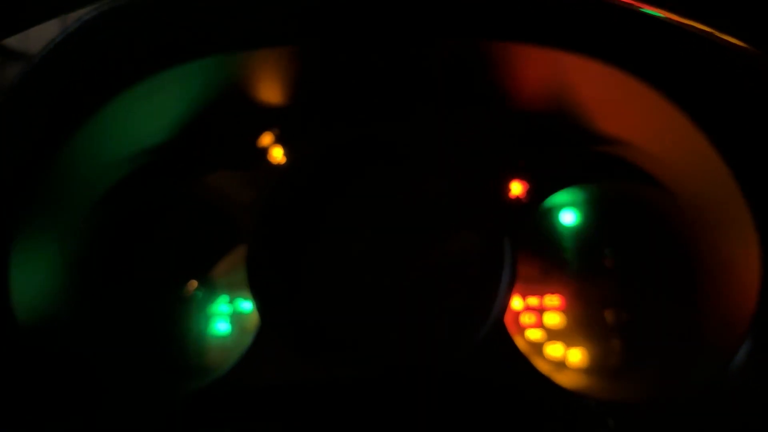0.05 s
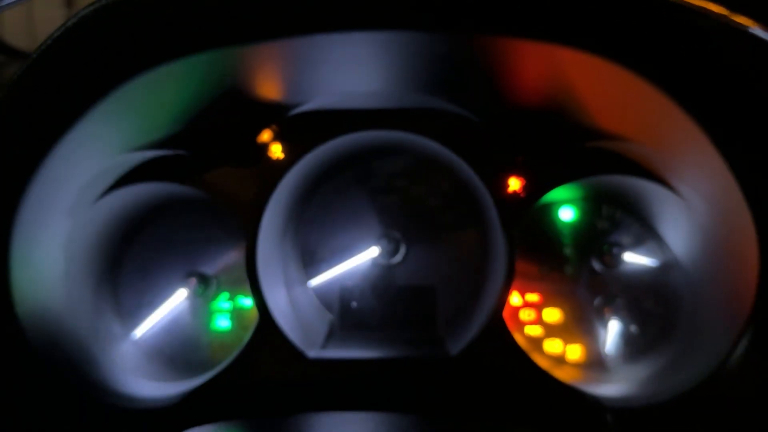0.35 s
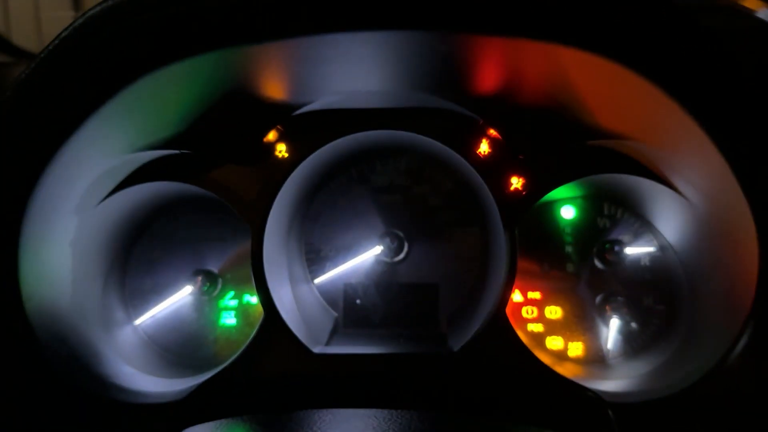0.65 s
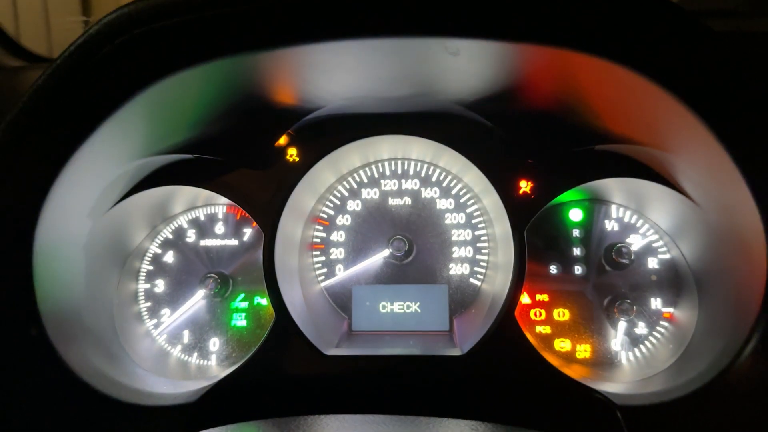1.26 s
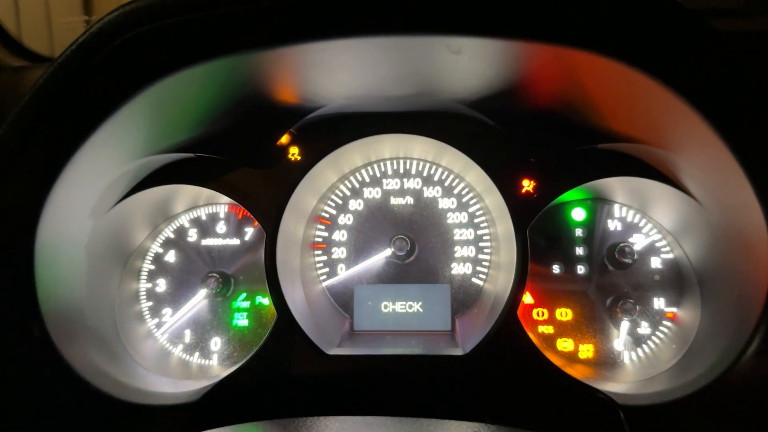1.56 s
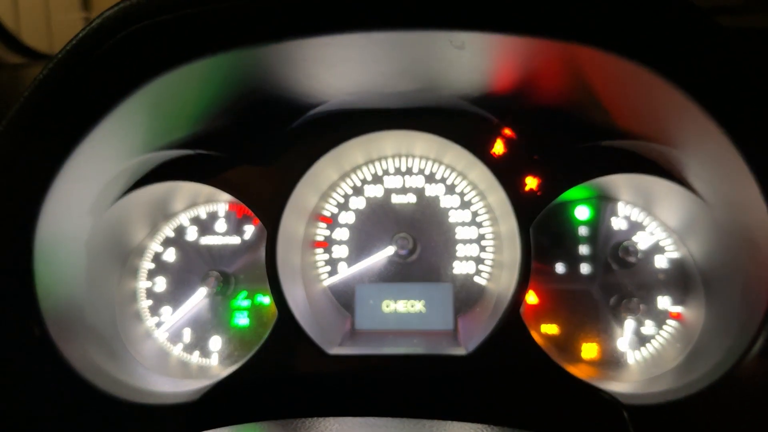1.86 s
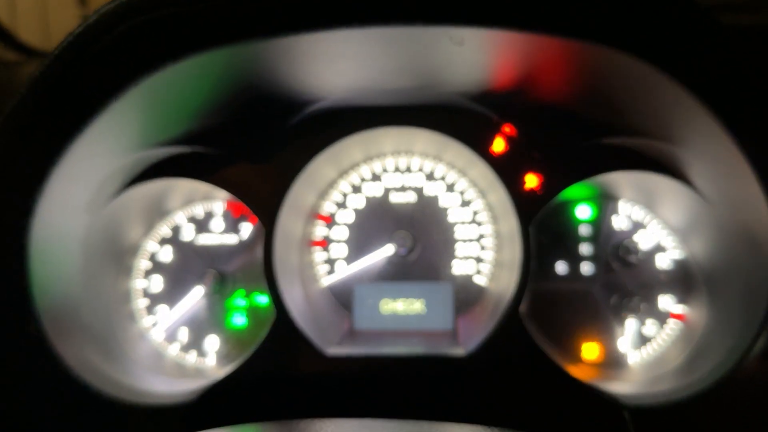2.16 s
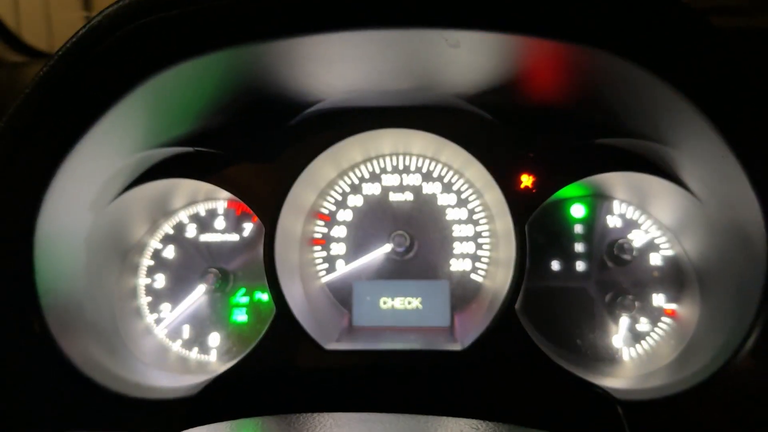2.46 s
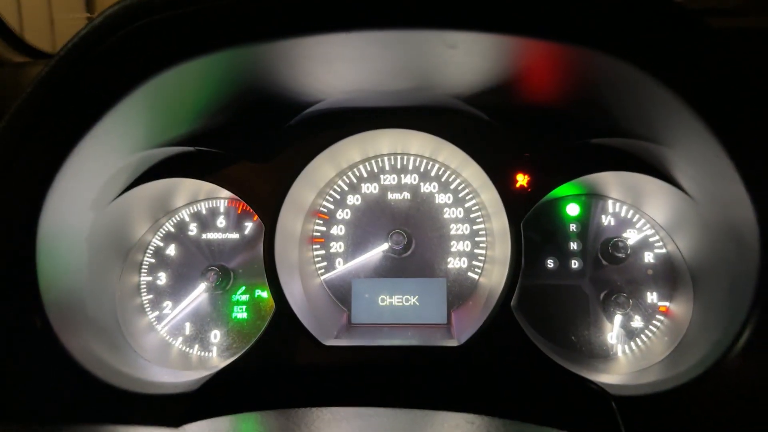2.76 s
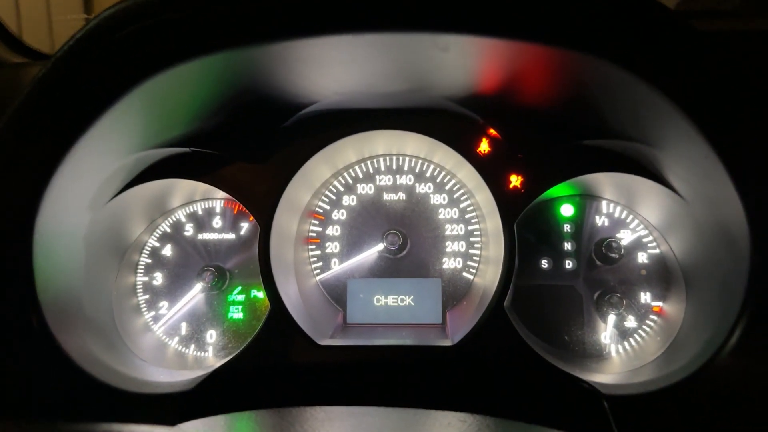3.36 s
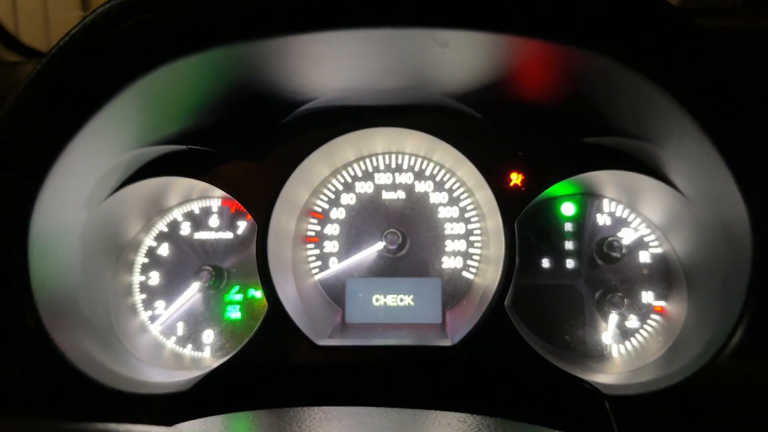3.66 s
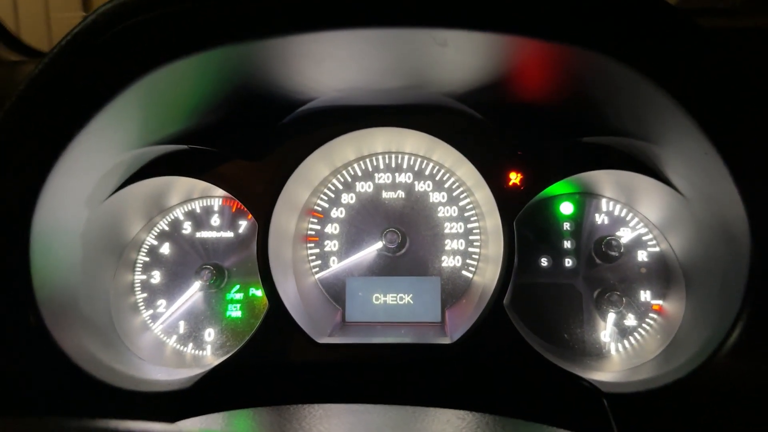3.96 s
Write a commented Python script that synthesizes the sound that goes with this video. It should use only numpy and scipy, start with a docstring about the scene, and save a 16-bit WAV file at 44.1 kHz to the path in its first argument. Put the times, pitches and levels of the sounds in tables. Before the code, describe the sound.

A car engine starts, flares briefly and settles into a low idle, heard from inside.

```python
"""A starter grinds and the first firings thump: a cold V8 catches, flares and sinks to a fast idle.
The stereo microphone is at the driver's seat, inside the cabin. Eight unequal exhaust pulses per
cycle ring the boomy modes of pipes and cabin, with a throbbing overtone and a brief intake boom.
Slack parts clank and the dry valve train clatters at first; hiss, rumble and tappet ticks carry on,
coming dully through the bulkhead."""
import sys
import numpy as np
from scipy import signal
from scipy.fft import rfft, irfft
from scipy.io import wavfile
from scipy.ndimage import uniform_filter1d, minimum_filter1d

SR = 44100
rng = np.random.default_rng(int(sys.argv[2]) if len(sys.argv) > 2 else 0)


def wrap_up_sound(samples):
    """Save the sound to the file named by the first command line argument, as 16-bit audio."""
    columns = np.atleast_2d(samples).T
    # keep every value between -1 and 1, then stretch to whole-number steps
    tamed = np.clip(columns, -1, 1)
    steps = np.round(tamed * 32767).astype(np.int16)
    wavfile.write(sys.argv[1], SR, steps)


N = 176400

# four-stroke engine speed: time_s, cycles_per_s
ENGINE_SPEED = [(0, 5.5), (.05, 7.3), (.13, 10), (.2, 13), (.28, 16.38), (.36, 16.97), (.52, 16.73),
                (.7, 15.98), (.85, 15.03), (1, 14.35), (1.25, 13.79), (1.6, 13.507), (2.1, 13.315),
                (3, 13.264), (3.5, 13.06), (4, 12.95)]
# cylinders in firing order, with their arrival down the manifold: level_db, offset_ms
CYLINDERS = [(0.5, 1.46), (4.5, 0.082), (2.5, -0.3), (1.2, 1.48), (1.03, -0.25), (3, 0.46), (1.26, 0.76),
             (0.58, -0.34)]

# hiss in the centre of the stereo image: frequency_hz, density_db
HISS_MID = [(350, -31.5), (600, -12.5), (676, -1), (741, -10), (990, -17), (1340, -28), (1510, -24),
            (2040, -36.5), (2210, -30.5), (2390, -37), (2660, -33), (3450, -37), (4400, -33.5),
            (6000, -39.5), (9550, -43), (14000, -59.5)]
# hiss at the sides: frequency_hz, density_db
HISS_SIDE = [(350, -36), (600, -8.5), (676, -5), (741, -13.5), (1190, -15.5), (1380, -16.5), (1720, -23.5),
             (2270, -35), (3600, -29), (4600, -37.5), (9550, -40), (11300, -49.5), (12300, -72),
             (14000, -45.5)]
# rumble of the running engine: frequency_hz, density_db
RUMBLE_SPECTRUM = [(25, -22), (45, -2), (90, -1.5), (200, -7.5), (330, -4.5), (600, -25.5), (900, -40.5)]
# metal striking metal: frequency_hz, density_db
CONTACT_SPECTRUM = [(620, 6), (2800, -7)]
# engine block modes: pitch_hz, width_hz, level_db, left_over_right_db, left_lead_rad, polarity
BLOCK_MODES = [(665, 39, 2, 4.5, 2.3, 1), (1004, 18, -5, 2.5, 2.4, 1), (1177, 30, -2, 3, 2.4, 1),
               (1509, 64, -0.5, 3, 2.1, 1), (1616, 100, -1.5, -1.5, 2.5, 1), (1834, 20, -8, -4.5, 0.9, 1),
               (2203, 17, -11, -4.5, 1.6, 1), (2550, 50, -10, -0.5, 1.4, 1)]

# grinding starter gear: frequency_hz, density_db
STARTER_SPECTRUM = [(1180, -29), (2000, -5), (3080, -7), (4780, -5), (5620, -12.5), (7850, -8), (8730, -12),
                    (10000, -29.5), (11600, -18.5), (14000, -23)]
# course of the grinding: time_s, level_db
STARTER_LEVEL = [(0, -49.5), (.025, -43), (.048, -44.5), (.06, -35), (.09, -36.5), (.11, -40), (.15, -34.5),
                 (.18, -45), (.28, -49.5), (.4, -61.5), (.8, -78), (1.3, -91.5)]
# ring of the freed starter: pitch_hz, width_hz, level_db, decay_db_per_s
STARTER_RINGS = [(4940, 240, -47.5, 75.5)]
# dry valve train behind the bulkhead: frequency_hz, density_db
CLATTER_SPECTRUM = [(260, -29), (450, -7.5), (553, -13.5), (674, 2), (1040, -11.5), (1200, -6.5),
                    (1290, -19), (1470, -8), (2040, -19), (2600, -25.5), (3380, -59), (5720, -120)]
# course of the clatter: time_s, level_db
CLATTER_LEVEL = [(0, -30.5), (.022, -43), (.035, -34), (.07, -22), (.14, -23), (.23, -32.5), (.3, -30),
                 (.4, -40.5), (.6, -46.5), (1, -58), (1.6, -68.5)]
# blows of slack parts on the block: start_s, level_db
CLANKS = [(.031, -26), (0.051, -20), (.08, -25.5), (.118, -18), (.138, -30), (0.186, -31.5), (0.217, -24),
          (.277, -27.5), (0.313, -35.5), (0.341, -33)]

# drive of the intake boom: time_s, gain_db
INTAKE_DRIVE = [(0, -1), (.2, 6.5), (.55, 4), (.75, -3), (1, -17), (1.4, -41)]
# how hard the firings shake the body: time_s, gain_db
THUMP_DRIVE = [(0, -7), (.022, 5.5), (.045, 14), (.1, 3), (.17, 11), (.23, 12), (.3, -16), (.5, -35.5)]
# strength of the firings in the exhaust: time_s, gain_db
EXHAUST_DRIVE = [(0, -1), (.05, 6.5), (.2, 9.5), (.32, 7), (.45, 6), (.7, 2.5), (1, 0.95), (4, 1)]
# pipe and cabin modes: pitch_hz, width_hz, level_db, left_over_right_db, left_lead_rad, polarity
EXHAUST_MODES = [(42.8, 9.1, 10, -3.2, -0.1, -1), (64.5, 8.46, 13.5, -1.8, 0.3246, 1),
                 (83.2, 19.5, 4.5, -0.8, 0.33, -1), (114.1, 28.8, -2.76, -2, 0.37, 1),
                 (171.35, 9.8, .5, -1, 0.36, -1), (195.3, 5.56, -8, -4.5, 1, 1),
                 (268.8, 52, -17, -11.5, 2.25, -1), (287.3, 30.4, -11, 12, 5, 1),
                 (320.1, 11.8, -0.5, -5.5, 1.14, 1), (349.2, 10, -8, -2.5, 3.14, -1),
                 (454.5, 18, -16.5, 6, 3, 1), (477.2, 41, -17.5, -2, 3, 1), (534, 24, -23.5, -5, 3.5, 1),
                 (618, 13, -30, -2.5, -2, 1), (664, 43, -25, 4.5, 1.83, 1), (686, 15, -32.5, 2.5, 4.5, -1)]

PULSE_GAIN_DB = 33  # added to all three drives


def amp(db):
    """Decibels to gain."""
    return 10 ** (np.asarray(db) / 20)


def curve(rows):
    """Straight lines through (time_s, value) rows."""
    return np.interp(np.arange(N) / SR, *np.array(rows).T)


def unit(x):
    """Scale to rms 1."""
    return x / np.sqrt(np.mean(x ** 2))


def stereo(mid, side):
    """Left and right from centre and sides."""
    return np.array([mid + side, mid - side])


def filtered(x, response):
    """Filter by a response given as a function of frequency."""
    hz = np.maximum(np.arange(N + 1) * SR / (2 * N), 1e-3)
    return irfft(rfft(x, 2 * N) * response(hz))[..., :N]


def resonance(f, hz, width_hz):
    """Response of one damped mode."""
    return 1 / (1 + 1j * (f * f - hz * hz) / (f * width_hz))


def resonate(x, hz, width_hz):
    """Pass twice through one damped mode."""
    return filtered(x, lambda f: resonance(f, hz, width_hz) ** 2)


def ring(x, modes):
    """Ring modes that reach the microphone's two sides with different level and phase."""
    def response(f):
        total = 0
        for hz, width_hz, db, pan_db, lead_rad, polarity in modes:
            left = amp(pan_db / 2) * np.exp(.5j * lead_rad)
            sides = np.array([[left], [1 / left]])
            total = total + polarity * amp(db) * sides * resonance(f, hz, width_hz)
        return total
    return filtered(x, response)


def noise(spectrum):
    """Noise of rms 1, shaped by a spectrum and falling steeply beyond its ends."""
    hz, db = np.array(spectrum).T
    def response(f):
        skirts = (np.minimum(f / hz[0], 1) * np.minimum(hz[-1] / f, 1)) ** 4
        return amp(np.interp(np.log(f), np.log(hz), db)) * skirts
    return unit(filtered(rng.standard_normal(N), response))


def engine_cycles(zero_s):
    """Four-stroke cycles turned, counted from zero_s."""
    cycles = np.cumsum(curve(ENGINE_SPEED)) / SR
    return cycles - np.interp(zero_s, np.arange(N) / SR, cycles)


def firings(scatter_db=0.65, jitter_ms=0.028):
    """One pulse per cylinder as the crank turns, each with its own strength and travel time."""
    slots = len(CYLINDERS) * engine_cycles(zero_s=1.9882)
    number = np.arange(np.ceil(slots[0]), slots[-1]).astype(int)
    db, offset_ms = np.array(CYLINDERS)[number % len(CYLINDERS)].T
    level_draw, time_draw = rng.standard_normal((len(number), 2)).T
    fired_s = np.interp(number, slots, np.arange(N) / SR)
    arrival_s = fired_s + (offset_ms + jitter_ms * time_draw) / 1000
    samples = np.clip(arrival_s * SR, 0, N - 1).astype(int)
    return np.bincount(samples, amp(db + scatter_db * level_draw), N)


def knocks(pulses, share, decay_s=0.022):
    """Envelope that jumps at each firing and dies quickly, over a steady part."""
    jumps = unit(signal.lfilter([1], [1, -np.exp(-1 / (decay_s * SR))], pulses))
    return unit(1 - share + share * jumps)


def engine_bay(pulses):
    """Hiss, rumble and tappets ticking on the block, beyond the bulkhead; louder at higher revs."""
    hiss = stereo(amp(-51.5) * noise(HISS_MID), amp(-55) * noise(HISS_SIDE))
    hiss *= knocks(pulses, share=0.16)
    uneven_pulses = pulses * amp(1.5 * rng.standard_normal(N))
    taps = knocks(uneven_pulses, share=0.35) * noise(CONTACT_SPECTRUM)
    ticks = amp(-53) * unit(ring(taps, BLOCK_MODES))
    rumble = amp(-38.5) * noise(RUMBLE_SPECTRUM)
    above_idle = curve(ENGINE_SPEED) - ENGINE_SPEED[-1][1]
    return (hiss + ticks + rumble) * amp(1.93 * above_idle)  # 1.93 dB for each cycle per second


def pipe_overtone(pulses):
    """A pipe overtone, pushed and pulled in turn by successive firings, swells once per cycle."""
    cycles = engine_cycles(zero_s=2.035)
    swell = np.cos(np.pi * cycles) ** 4
    push_pull = np.cos(np.pi * cycles * len(CYLINDERS))
    return amp(-41) * unit(resonate(pulses * swell * push_pull, hz=474, width_hz=50))


def starter(tooth_hz=325, release_s=0.13):
    """Gear teeth grind, then the pinion lets go and rings down."""
    t = np.arange(N) / SR
    teeth = amp(rng.standard_normal(N)[(t * tooth_hz).astype(int)])  # 1 dB of scatter, tooth to tooth
    grind = stereo(noise(STARTER_SPECTRUM), amp(-1.5) * noise(STARTER_SPECTRUM))
    sound = unit(grind * teeth) * amp(curve(STARTER_LEVEL))
    for hz, width_hz, db, decay_db_per_s in STARTER_RINGS:
        ringing = unit(resonate(rng.standard_normal((2, N)), hz, width_hz))
        sound += ringing * (t > release_s) * amp(db - decay_db_per_s * (t - release_s))
    return sound


def valve_clatter(pulses):
    """The valve train rattles until the oil arrives."""
    rattle = unit(stereo(noise(CLATTER_SPECTRUM), amp(2) * noise(CLATTER_SPECTRUM)))
    return rattle * knocks(pulses, share=0.66) * amp(curve(CLATTER_LEVEL))


def clanks(decay_s=0.019):
    """Slack metal parts rattle against the block as the engine catches."""
    t = np.arange(N) / SR
    blows = sum(amp(db) * (t > start_s) * np.exp(-np.abs(t - start_s) / decay_s)
                for start_s, db in CLANKS)
    contact = noise(CONTACT_SPECTRUM)
    return ring(contact * blows, BLOCK_MODES) / ring(contact, BLOCK_MODES).std()


def intake_boom(pulses):
    """The intake resonates as the revs flare."""
    return resonate(pulses * amp(PULSE_GAIN_DB + curve(INTAKE_DRIVE)), hz=194.8, width_hz=22)


def body_thump(pulses):
    """The first hard firings rock the engine on its mounts and shake the body."""
    return resonate(pulses * amp(PULSE_GAIN_DB + curve(THUMP_DRIVE)), hz=76, width_hz=88)


def exhaust(pulses, low_cut_hz=54.3, high_cut_hz=485):
    """Rounded pulses ring the pipes and the cabin around the microphone."""
    driven = pulses * amp(PULSE_GAIN_DB + curve(EXHAUST_DRIVE))
    rounding = lambda f: 1 / ((1 + 1j * f / high_cut_hz) * (1 + low_cut_hz / (1j * f))) ** 2
    return ring(filtered(driven, rounding), EXHAUST_MODES)


def scene():
    """The engine from the driver's seat: one train of firings, plus the clanks and the starter."""
    pulses = firings()
    machinery = engine_bay(pulses) + valve_clatter(pulses) + clanks() + starter()
    return machinery + pipe_overtone(pulses) + intake_boom(pulses) + body_thump(pulses) + exhaust(pulses)


def record(dry):
    """The recorder's limiter holds the loudest peaks; the top octave is cut short."""
    ceiling, smooth_samples, top_hz = .9, 441, 14400
    gain = ceiling / np.maximum(np.abs(dry).max(axis=0), ceiling)
    held_gain = minimum_filter1d(gain, 2 * smooth_samples)
    limited = dry * uniform_filter1d(held_gain, smooth_samples)
    return signal.sosfilt(signal.ellip(8, .2, 70, top_hz, fs=SR, output="sos"), limited)


dry = scene()
out = record(dry)
wrap_up_sound(out)
```